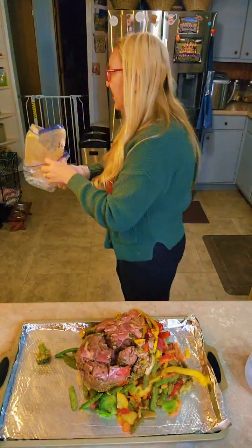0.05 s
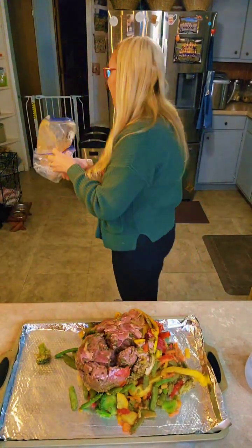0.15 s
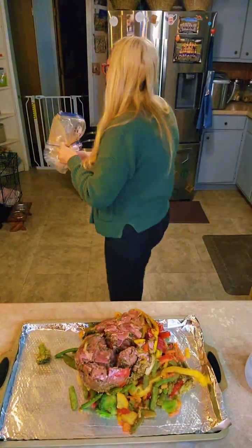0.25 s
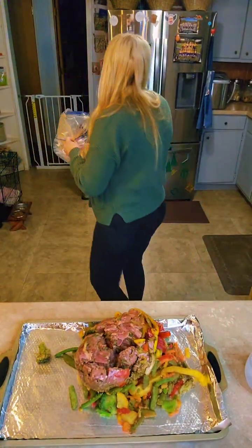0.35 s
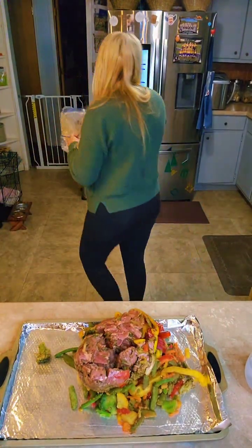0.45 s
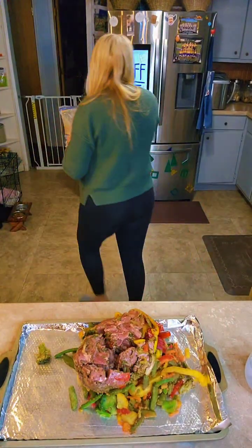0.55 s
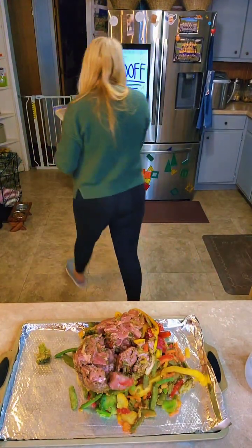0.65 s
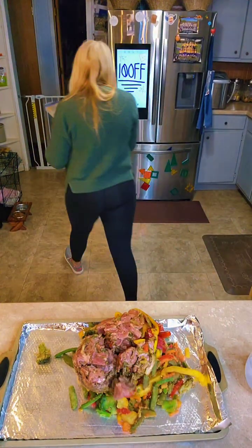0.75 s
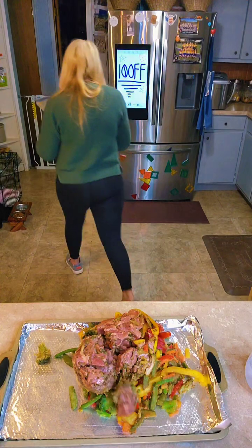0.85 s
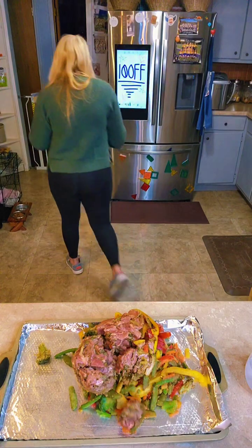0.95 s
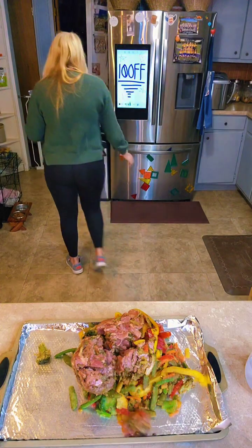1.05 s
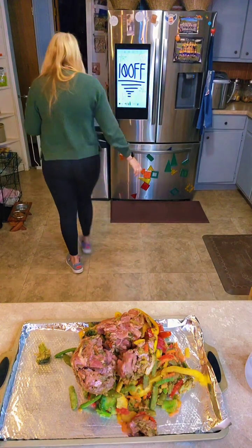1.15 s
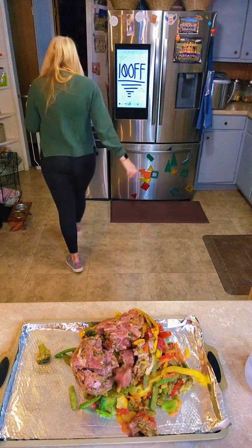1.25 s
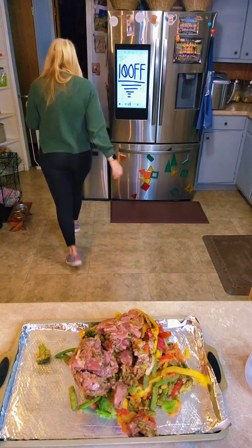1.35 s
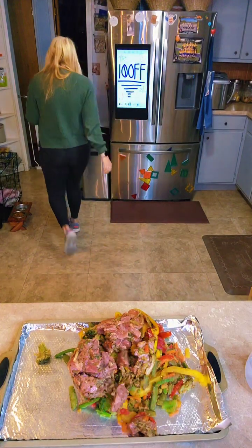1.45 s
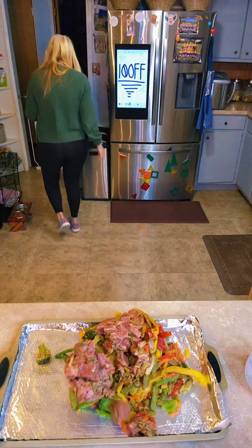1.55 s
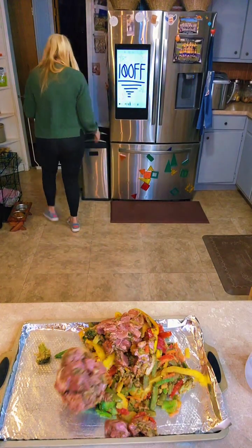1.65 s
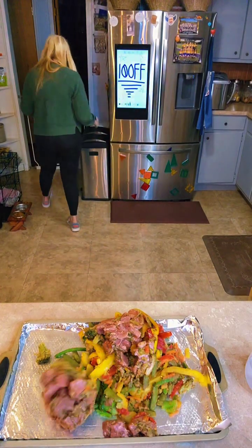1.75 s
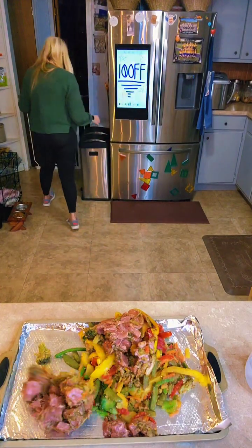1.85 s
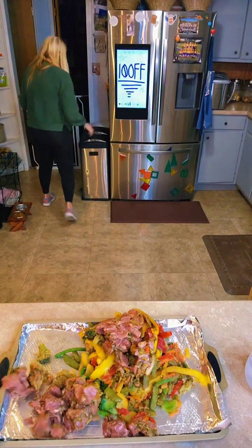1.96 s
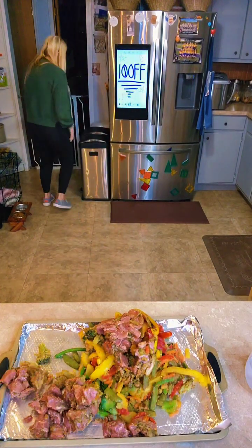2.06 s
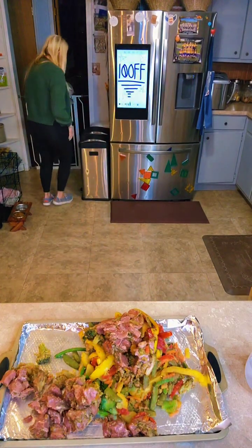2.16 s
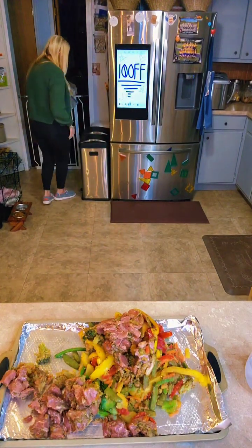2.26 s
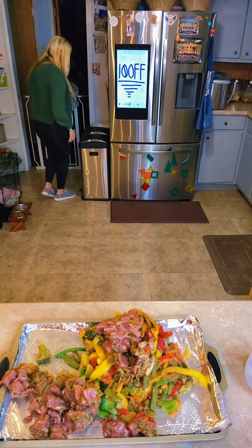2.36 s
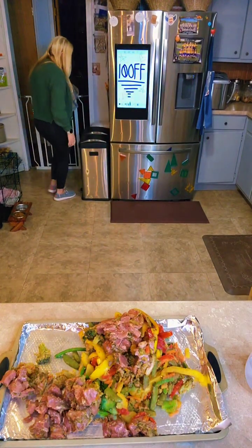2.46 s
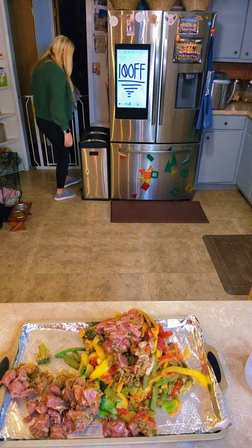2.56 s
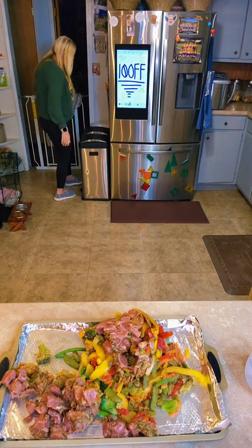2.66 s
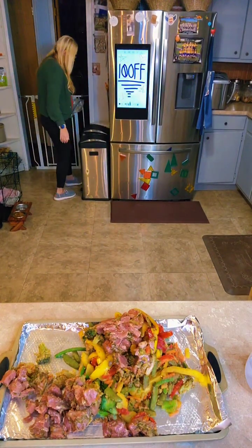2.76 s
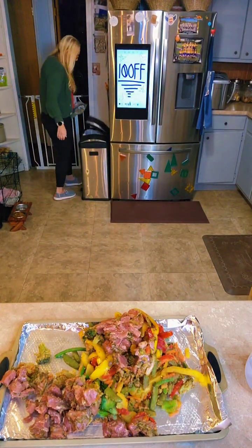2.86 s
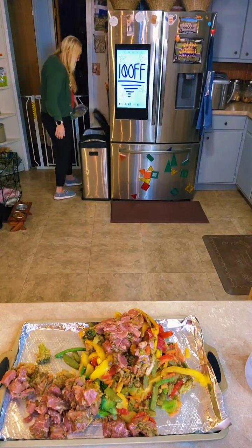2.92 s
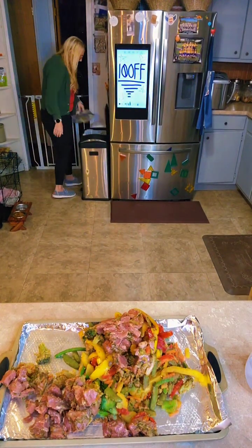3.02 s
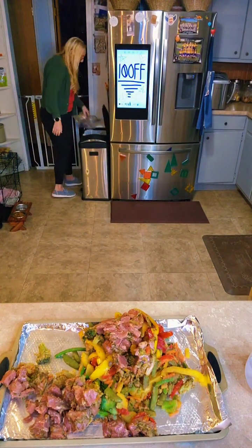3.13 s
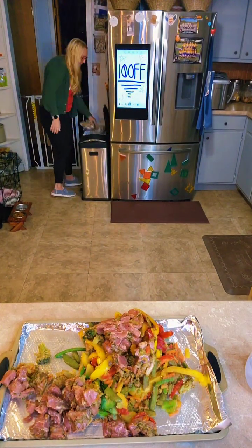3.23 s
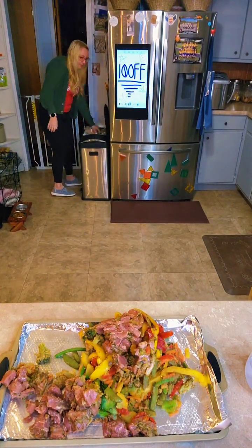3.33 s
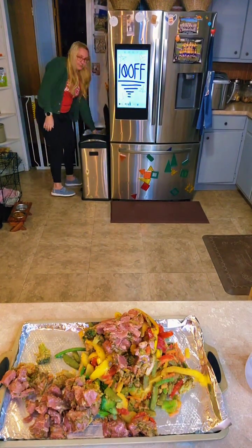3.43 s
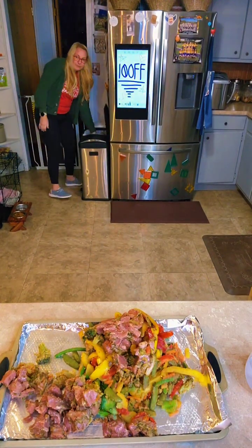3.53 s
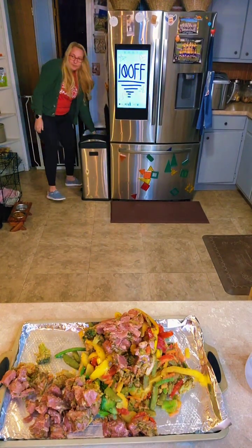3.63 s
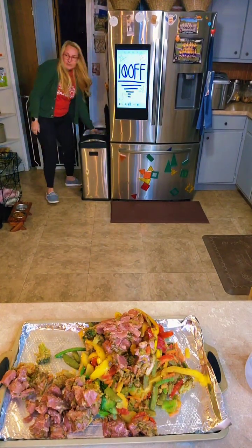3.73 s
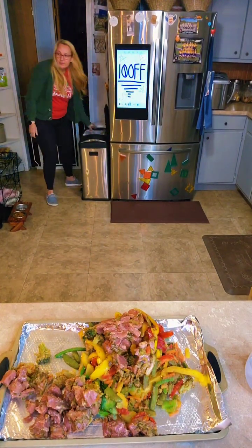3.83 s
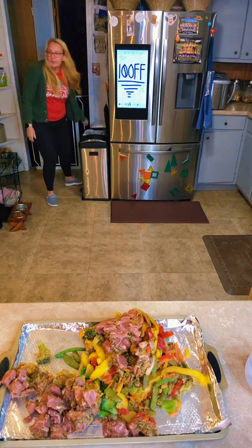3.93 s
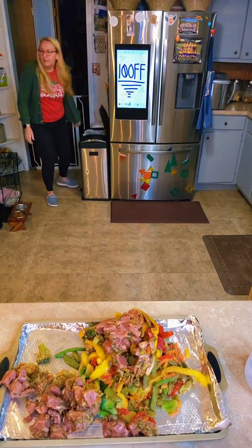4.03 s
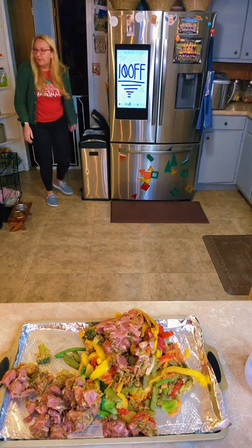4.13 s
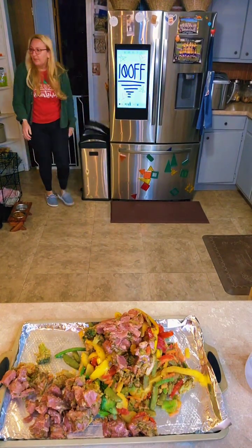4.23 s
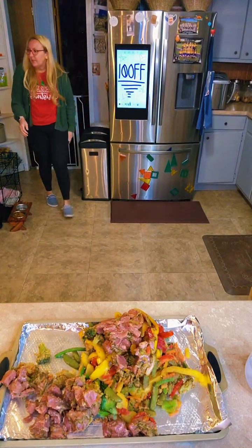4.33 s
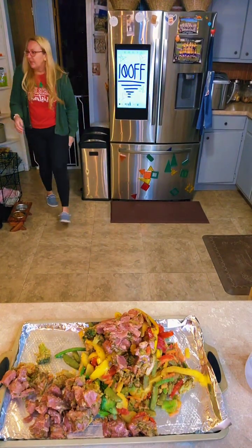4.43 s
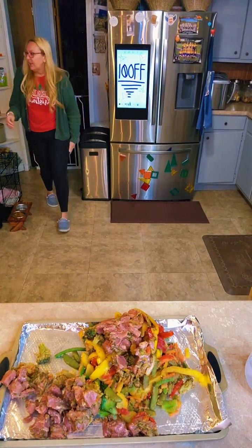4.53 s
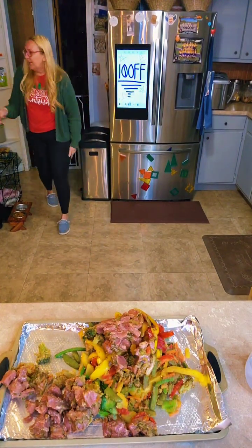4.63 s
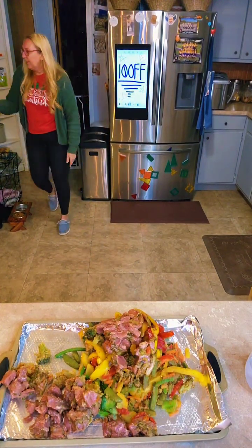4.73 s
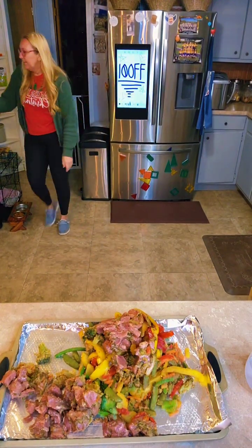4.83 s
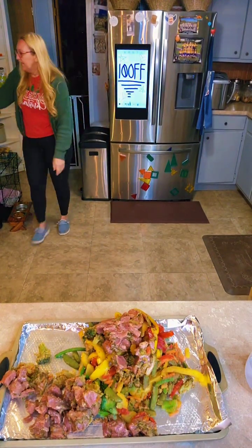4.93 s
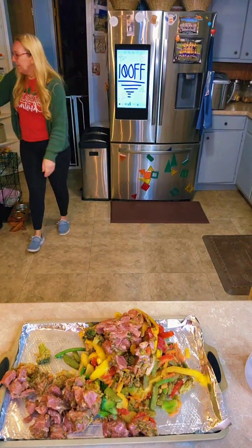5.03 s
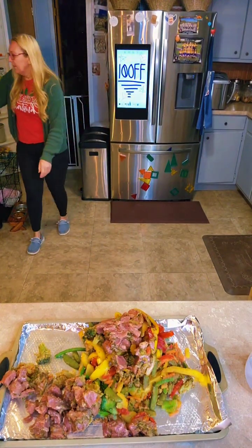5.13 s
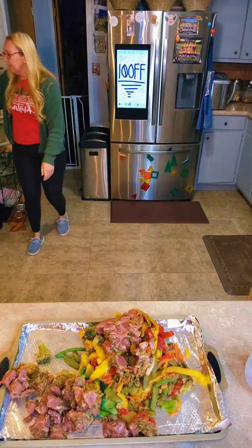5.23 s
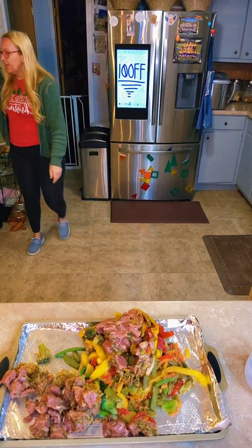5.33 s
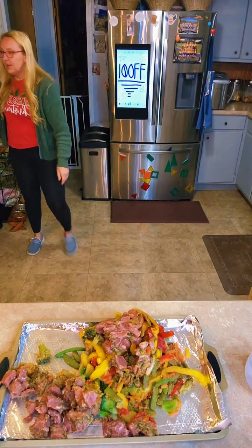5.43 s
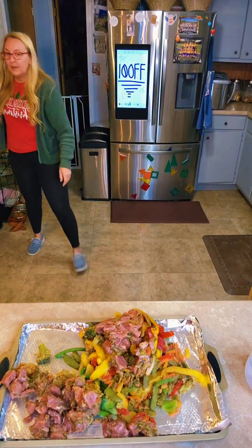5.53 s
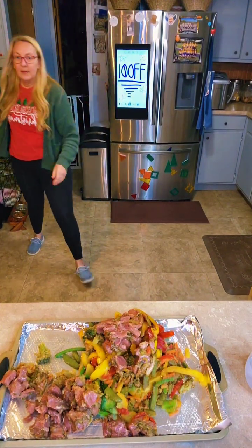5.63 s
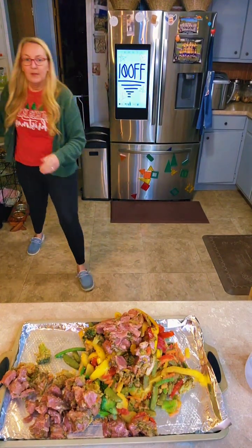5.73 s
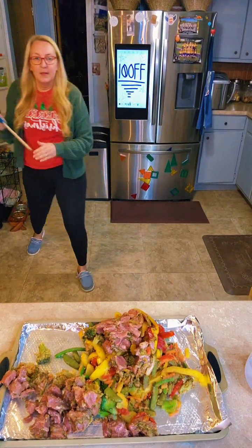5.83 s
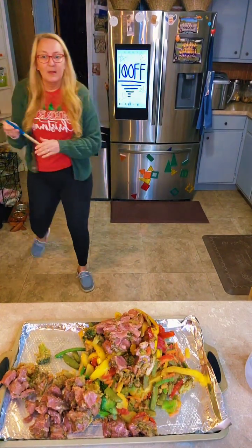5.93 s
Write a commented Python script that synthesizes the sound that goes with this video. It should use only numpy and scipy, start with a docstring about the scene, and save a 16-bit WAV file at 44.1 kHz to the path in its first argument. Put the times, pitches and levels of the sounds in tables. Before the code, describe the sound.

In a hard, slightly echoing kitchen, light plastic rustling and cushioned footsteps give way to loud, crisp foil crackles. A bin pedal is pressed and the hinge rattles. A bag lands inside with a hollow thud and a rustle, then the lid bangs down with a low ring. Quiet steps, scuffs and brushing clothes finish, over a faint room rumble, through a microphone with sharp treble.

```python
"""A kitchen clean-up. Someone in soft shoes carries a rustling plastic bag to a pedal bin, while food
topples onto foil, which buckles in flurries of snaps. The pedal raises the lid, which sways and rattles.
Near 2.9 s the bag thuds in, exciting the bin's modes, and settles; near 4.1 s the lid slams and rings.
The walker comes back, rubbing a hand on cloth, amid faint squeaks. Throughout, the hard room
reverberates after every knock, and the microphone has a sharp peak near 9 kHz."""
import sys
import numpy as np
from scipy import signal
from scipy.fft import rfft, irfft, next_fast_len
from scipy.io import wavfile
from scipy.ndimage import uniform_filter1d

SR = 44100
rng = np.random.default_rng(int(sys.argv[2]) if len(sys.argv) > 2 else 0)


def materialize(psi):
    """Save the field psi as 16-bit PCM at rate SR to the path in sys.argv[1].

    A 1-D psi becomes a single channel; in a 2-D psi each row is a channel.
    """
    bounded = np.clip(np.atleast_2d(psi).T, -1, 1)
    quanta = np.round(bounded * 32767).astype(np.int16)
    wavfile.write(sys.argv[1], SR, quanta)


N = 263806
T = np.arange(SR) / SR  # time within one event, s
CLOCK = np.arange(N) / SR  # time within the scene, s

# normal modes of the lid: frequency_hz, level_db, t60_s
LID_MODES = [(50.6, -22.5, 1), (86.6, 0, 0.47), (123.5, -4.5, 0.3), (248, -5, 0.55), (277, 4, 0.13),
             (386, -16.5, 0.22), (403, -15, 0.61), (447, 2, 0.34), (499, -5, 0.4), (591, -13, 0.47),
             (631, -15.5, 0.44), (704, -1.5, 0.23), (1144, -15.5, 0.38), (1280, -9, .35)]


def amp(db):
    """Amplitude ratio: a factor of ten for every 20 dB."""
    return 10 ** (np.asarray(db) / 20)


def unit(x):
    """Normalisation to an rms of 1."""
    return x / np.sqrt(np.mean(x ** 2) + 1e-20)


def along(points, hz):
    """Interpolation of (frequency, value) points on a logarithmic frequency axis."""
    f, v = np.transpose(points)
    return np.interp(np.log(hz + 1), np.log(f + 1), v)


def coloured(x, gain_db):
    """Linear filtering: the spectrum of x is weighted by a dB function of frequency."""
    m = next_fast_len(len(x) + 8192)
    return irfft(rfft(x, m) * amp(gain_db(np.fft.rfftfreq(m, 1 / SR))), m)[:len(x)]


def noise(spectrum, size):
    """Spectral shaping of white noise, scaled to an rms of 1."""
    return unit(coloured(rng.standard_normal(size), lambda hz: along(spectrum, hz)))


def add(track, start_s, sound):
    """Superposition: a sound adds to the track from start_s on."""
    start = round(start_s * SR)
    track[start:start + len(sound)] += sound[:N - start]


def resonances(bands, hz):
    """Overlapping resonances add in power; the result is a gain in dB."""
    power = sum(amp(db) ** 2 / (1 + (2 * (hz - centre) / width) ** 2) ** 1.6
                for centre, width, db in bands)
    return 10 * np.log10(power)


def ring(modes, swell_s):
    """Modal vibration: damped sinusoids of random phase build up, then decay at their own rates."""
    tones = sum(amp(db - 60 * T / t60) * np.sin(2 * np.pi * (hz * T + rng.random()))
                for hz, db, t60 in modes)
    return tones * (1 - np.exp(-T / swell_s))


def friction_envelope(strokes, attack_s, release_s):
    """Incoherent sources add in power: each sliding stroke sets in, weakens and dies away."""
    sag_db_per_s = 15
    power = np.zeros(N)
    for start, length, db in strokes:
        t = np.maximum(CLOCK - start, 0)
        shape = (1 - np.exp(-t / attack_s)) * np.exp(-np.maximum(t - length, 0) / release_s)
        power += (amp(db - sag_db_per_s * t) * shape) ** 2
    return np.sqrt(power)


def room_decay(x):
    """Absorption: each frequency of x falls by 60 dB in its reverberation time."""
    # reverberation of the kitchen: frequency_hz, t60_s
    reverb_times = [(60, 0.57), (200, 0.54), (600, 0.41), (3000, 0.43), (8000, 0.34), (14000, 0.27)]
    hz, t, spectra = signal.stft(x, SR, nperseg=512)
    decay = amp(-60 * t / along(reverb_times, hz)[:, None])
    return signal.istft(spectra * decay, SR, nperseg=512)[1][:len(x)]


def burst(colour, rise_s, decay_s, room_db, direct_db=0):
    """Direct and diffuse sound: as a contact's puff of noise decays, its reverberation builds."""
    puff, tail = (unit(coloured(rng.standard_normal(SR), colour)) for _ in range(2))
    direct = amp(direct_db) * puff * np.exp(-T / decay_s)
    diffuse = amp(room_db) * room_decay(tail) * (1 - np.exp(-T / decay_s))
    return (direct + diffuse) * (1 - np.exp(-T / rise_s))


def knock(contacts, spectrum, modes, ring_db, decay_s, room_db):
    """Impact excitation: each contact cracks, and the heaviest sets the modes ringing."""
    out = np.zeros(N)
    for start, db, crack_db in contacts:
        crack = burst(lambda hz: along(spectrum, hz), 0.00091, decay_s, room_db, crack_db + 6.5)
        add(out, start, amp(db) * crack)
    start, db, _ = max(contacts, key=lambda row: row[1])
    add(out, start, amp(db + ring_db) * ring(modes, swell_s=0.0012))
    return out


def room_rumble():
    """Ambient noise: steady, and strongest at low frequencies."""
    # spectrum of the quiet room: frequency_hz, level_db
    spectrum = [(25, 0.5), (45, -4.5), (90, 0.5), (200, -7), (500, -13.5), (1200, -20), (3000, -21.5),
                (8000, -26), (15000, -25)]
    return amp(-62) * noise(spectrum, N)


def squeaks():
    """Amplitude modulation by slow noise makes faint gliding tones stutter."""
    # thin squeaks: start_s, end_s, start_hz, end_hz, level_db
    glides = [(3.594, 3.612, 5430, 5400, -60), (4.573, 4.948, 2460, 2405, -68.5),
              (4.579, 4.8, 1120, 1132, -68), (5.3, 5.413, 1493, 1474, -69.5),
              (5.733, 5.923, 1660, 1540, -70.5)]
    out = np.zeros(N)
    for start, end, from_hz, to_hz, db in glides:
        hz = np.interp(start + T, [start, end], [from_hz, to_hz])
        tone = np.sin(2 * np.pi * np.cumsum(hz) / SR)
        stutter = noise([(40, 8.5), (120, -5), (350, -46)], SR)
        fade = (1 - np.exp(-T / 0.011)) * np.exp(-np.maximum(start + T - end, 0) / 0.02)
        add(out, start, amp(db) * fade * unit(stutter * tone))
    return out


def cloth_rub():
    """Stick-slip friction: cloth catches and slips under the hand, hissing in a few bands."""
    # the hand's stroke: start_s, length_s, level_db
    strokes = [(5.008, 0.2, -46)]
    # resonances of the rubbed cloth: centre_hz, width_hz, level_db
    bands = [(527, 280, 0.5), (1244, 190, 5), (1600, 220, -2), (2400, 690, -7), (4580, 280, 1.5),
             (5580, 260, 2.5), (6600, 1600, -2), (8200, 2300, -9.5), (11930, 5000, -14)]
    catch = unit(uniform_filter1d(rng.standard_normal(N), size=300))
    hiss = unit(coloured(rng.standard_normal(N), lambda hz: resonances(bands, hz)))
    return friction_envelope(strokes, attack_s=0.029, release_s=0.06) * hiss * amp(1.6 * catch)


def scuffs():
    """Friction noise: shoe, pedal and hinge scrape briefly, each in its own broad band."""
    # light scuffs and taps: start_s, level_db, decay_s, centre_hz
    scrapes = [(0.111, -51.5, .025, 1380), (.902, -62.5, 0.04, 2110), (1.041, -58, 0.012, 790),
               (2.205, -46, 0.012, 2970), (2.507, -46.5, 0.015, 1530), (3.778, -52.5, 0.074, 740),
               (4.816, -45.5, 0.015, 550), (5.012, -58.5, 0.22, 714), (5.175, -48, .056, 2010),
               (5.248, -47, 0.018, 4800), (5.558, -46, 0.015, 1120)]
    width_octaves = 0.97  # from the centre to 9 dB down
    out = np.zeros(N)
    for start, db, decay_s, centre_hz in scrapes:
        colour = lambda hz: -30 * np.log10(1 + (np.log2((hz + 1) / centre_hz) / width_octaves) ** 2)
        add(out, start, amp(db + 4) * burst(colour, 0.07 * decay_s, decay_s, room_db=-8))
    return out


def footsteps():
    """Cushioned impact: a dull heel, then the brighter ball; a slow roll softens both onsets."""
    # footfalls on floor and pedal: start_s, level_db, roll_s
    footfalls = [(.04, -53.5, 0.06), (.605, -51, 0.041), (1.04, -57, .025), (1.179, -57, .075),
                 (1.559, -56.5, 0.011), (1.664, -50.5, 0.096), (2.079, -50, 0.023), (2.208, -53, 0.0096),
                 (2.472, -42.5, .036), (2.51, -44.5, .04), (2.77, -58.5, 0.016), (3.21, -55.5, 0.015),
                 (3.411, -57, .035), (3.678, -54, 0.021), (3.764, -48, 0.093), (4.368, -56, 0.029),
                 (4.571, -59.5, 0.015), (4.818, -52.5, 0.019), (4.962, -50.5, .02), (5.50, -53.5, 0.049)]
    # spectrum of a soft sole: frequency_hz, level_db
    sole = [(30, -12.5), (55, 2), (90, -1), (220, -7), (330, -13.5), (500, -12), (900, -20), (1500, -24),
            (3000, -32.5), (6000, -33.5), (15000, -48)]
    out = np.zeros(N)
    for start, db, roll_s in footfalls:
        heel = (start, db + 5.5, roll_s, 0)
        ball = (start + roll_s, db + 5, 0.76 * roll_s, 2)
        for onset, part_db, decay_s, db_per_octave in (heel, ball):
            colour = lambda hz: along(sole, hz) + db_per_octave * np.log2(np.clip(hz, 50, 1500))
            add(out, onset, amp(part_db) * burst(colour, 0.13 * decay_s, decay_s, room_db=-2.5))
    return out


def lid_sway():
    """Soft excitation favours low modes: the raised lid sways with a dull ring as its hinge rattles."""
    # pushes on the lid: start_s, level_db, swell_s
    nudges = [(2.472, -37, 0.04), (2.51, -45, 0.024), (3.42, -52.5, 0.035), (3.86, -51, 0.024),
              (3.929, -56.5, 0.012)]
    # rattles of the hinge: start_s, level_db, decay_s, tilt_db_per_octave
    rattles = [(2.071, -52, 0.035, -1), (2.207, -54, 0.0088, 3), (2.507, -45, 0.03, 3),
               (3.803, -51, .012, 4), (3.849, -46, 0.049, -6.5)]
    # resonances of the hinge: centre_hz, width_hz, level_db
    bands = [(1760, 190, 0), (2800, 230, 2.5), (3300, 220, -1.5), (4350, 400, -7)]
    out = np.zeros(N)
    soft_modes = [(hz, db - 4.8 * np.log2(hz / 100), t60) for hz, db, t60 in LID_MODES]
    for start, db, swell_s in nudges:
        add(out, start, amp(db + 8) * ring(soft_modes, swell_s))
    for start, db, decay_s, db_per_octave in rattles:
        colour = lambda hz: resonances(bands, hz) + db_per_octave * np.log2(np.clip(hz, 1500, 5000))
        add(out, start, amp(db) * burst(colour, 0.00068, decay_s, room_db=-9))
    return out


def rustle():
    """Sliding friction of plastic film and clothing: tiny random ticks within a soft hiss."""
    # hand on bag, bag on liner, clothing: start_s, length_s, level_db
    strokes = [(0, 0.24, -43.5), (.28, 0.12, -46), (.455, 0.022, -44), (.495, 0.092, -45), (.68, .2, -57),
               (1.04, 0.025, -51.5), (1.19, 0.42, -63), (3.02, 0.096, -38.5), (3.125, .2, -37),
               (3.5, 0.17, -52), (3.85, 0.0083, -41.5), (3.966, 0.013, -53), (4.4, 0.48, -57.5),
               (4.822, 0.093, -41.5), (5.02, 0.24, -45), (5.508, .06, -60), (5.775, 0.054, -61)]
    # spectrum of sliding film: frequency_hz, level_db
    film = [(150, -4.5), (400, -10), (900, -3), (1800, -3.5), (3000, -4.5), (5000, -3), (8000, -3.5),
            (11000, -5), (15000, -10.5)]
    ticks_per_s = 350
    sizes = amp(6.3 * np.clip(rng.standard_normal(N), -2, 2))
    ticks = np.sign(rng.standard_normal(N)) * (rng.random(N) < ticks_per_s / SR) * sizes
    grain = unit(coloured(ticks, lambda hz: along(film, hz)))
    texture = amp(-8.5) * noise(film, N) + amp(-14.5) * grain
    return friction_envelope(strokes, attack_s=0.0043, release_s=0.067) * texture


def creases():
    """Buckling: thin sheet snaps in flurries; longer ones are duller and more reverberant."""
    # flurries in bag and foil: start_s, level_db, decay_s
    flurries = [(0.107, -37, 0.005), (0.194, -46, 0.0086), (0.214, -47.5, 0.0062), (0.875, -58, 0.0055),
                (.89, -51, 0.01), (0.936, -53.5, 0.0092), (1.038, -51.5, 0.067), (1.437, -54, 0.0089),
                (1.528, -55, 0.0041), (1.558, -38.5, 0.012), (1.6, -41.5, 0.012), (1.617, -19.5, 0.0099),
                (1.696, -22.5, 0.013), (1.718, -32.5, 0.02), (1.762, -30.5, .015), (1.82, -29, 0.0086),
                (1.953, -37, 0.0055), (2.010, -36, 0.0092), (2.024, -29.5, 0.0012), (2.081, -53, 0.068),
                (2.255, -51.5, 0.0095), (2.274, -42.5, 0.0031), (2.347, -50, .0012), (2.508, -49.5, .006),
                (3.85, -51.5, 0.0051)]
    # spectrum of the snaps: frequency_hz, level_db
    crackle = [(300, -33), (1200, -24.5), (2100, -19), (2900, -5.5), (4200, -6.5), (5600, 1.5), (8500, 4.5),
               (11000, 1), (15000, -0.5)]
    out = np.zeros(N)
    for start, db, decay_s in flurries:
        treble_db = -2 - 3 * np.log2(decay_s / 0.0078)
        colour = lambda hz: along(crackle, hz) + along([(4000, 0), (6500, treble_db)], hz)
        flicker = unit(uniform_filter1d(rng.standard_normal(SR), size=60))
        after_snaps = amp(2.4 * flicker * np.exp(-T / 0.062) * (1 - np.exp(-T / 0.005)))
        rise_s = min(decay_s ** 2 / 0.043, 0.006)  # single snaps start at once, long flurries build
        room_db = -8 + 15.2 * np.log10(decay_s / 0.014)
        add(out, start, amp(db + 4.5) * after_snaps * burst(colour, rise_s, decay_s, room_db))
    return out


def bag_settle():
    """Sliding friction: the bag's weight shifts in the bin with a low rustle."""
    # shifts of the bag: start_s, length_s, level_db
    shifts = [(3.1, 0.27, -45), (3.42, 0.2, -56.5)]
    # spectrum of the liner: frequency_hz, level_db
    liner = [(40, -19), (100, -4), (500, -4), (900, -11.5), (3000, -11), (7000, -15.5), (15000, -17)]
    return friction_envelope(shifts, attack_s=0.02, release_s=0.034) * noise(liner, N)


def bag_drop():
    """Impact and free vibration: the bag thuds in and the bin's body rings."""
    # the bag landing: start_s, level_db, crack_db
    contacts = [(2.903, -44.5, 10.5), (2.908, -23, 5.5), (2.917, -26, 5.5), (2.924, -24.5, 5.5)]
    # spectrum of the thud: frequency_hz, level_db
    spectrum = [(30, -17), (80, -18), (130, -9), (220, -2), (400, -6.5), (650, -7.5), (1000, -15),
                (1500, -14.5), (2200, -18), (4000, -20.5), (7000, -19.5), (11000, -20.5), (15000, -26)]
    # normal modes of the bin's body: frequency_hz, level_db, t60_s
    modes = [(94.5, -13, .6), (161.8, 3.5, 0.17), (219.3, 7, 0.24), (287.7, 0, 0.15), (399, -4, 0.2),
             (544, -29, 0.43), (632, -5, 0.15), (753, -18, 0.49), (924, -20.5, 0.15), (1065, -28, 0.16)]
    return knock(contacts, spectrum, modes, ring_db=0, decay_s=0.0026, room_db=-1)


def lid_slam():
    """Repeated impact: the lid strikes the rim several times and rings in its normal modes."""
    # the lid meeting the rim: start_s, level_db, crack_db
    contacts = [(4.133, -46.5, -2.5), (4.140, -38, 4.5), (4.145, -30.5, 9.5), (4.149, -17.5, -1),
                (4.156, -20, -20), (4.160, -31, 9), (4.177, -33.5, 7.5)]
    # spectrum of the slam: frequency_hz, level_db
    spectrum = [(25, -15), (50, -46.5), (90, 1), (180, -11), (400, -6.5), (700, -11.5), (950, -20),
                (1400, -18.5), (2100, -23), (4000, -23.5), (7000, -23.5), (11000, -27), (15000, -30.5)]
    return knock(contacts, spectrum, LID_MODES, ring_db=-3, decay_s=0.0033, room_db=-3)


def scene():
    """Superposition of the room, the sheets, the bin and the walker in one channel."""
    background = room_rumble()
    sheets = creases() + rustle()
    pedal_bin = bag_drop() + lid_slam() + bag_settle() + lid_sway()
    movement = footsteps() + scuffs() + cloth_rub() + squeaks()
    return (background + sheets + pedal_bin + movement)[None]


def record(dry):
    """Frequency response: the microphone peaks near 9 kHz, and a band limit cuts the top."""
    # response of the microphone: frequency_hz, gain_db
    response = [(5000, 0), (7300, 4), (8200, 9.5), (8800, 13), (9300, 13.5), (9650, 4.5), (11000, 2),
                (12000, -4), (12800, -4.5), (15800, -5)]
    top_hz = 16000
    return coloured(dry[0], lambda hz: along(response, hz) - 100 * (hz > top_hz))[None]


dry = scene()
out = record(dry)
materialize(out)
```